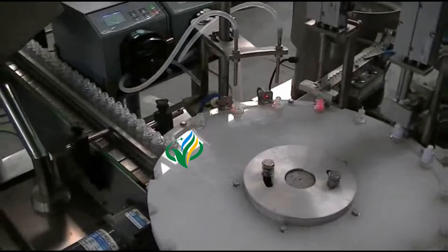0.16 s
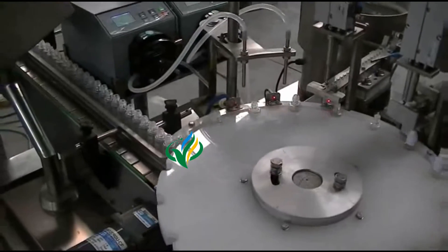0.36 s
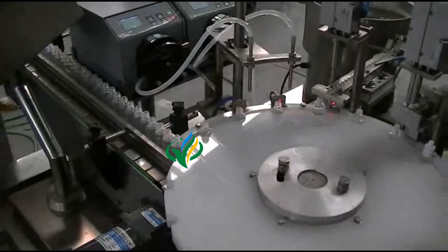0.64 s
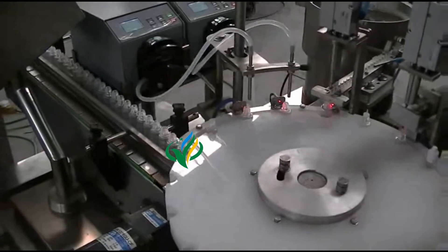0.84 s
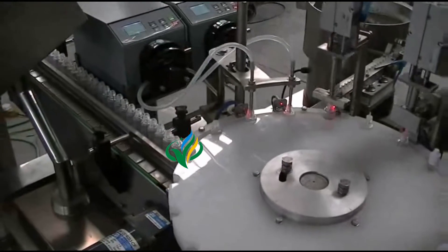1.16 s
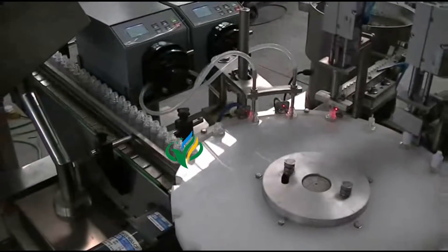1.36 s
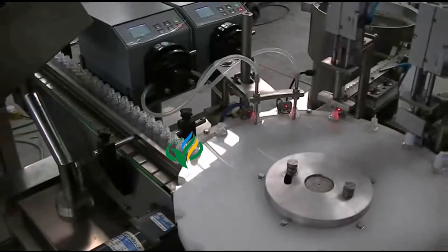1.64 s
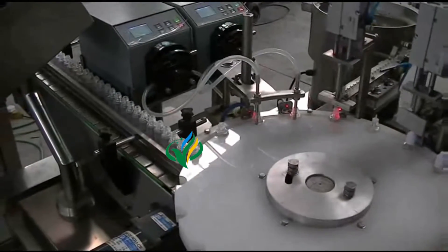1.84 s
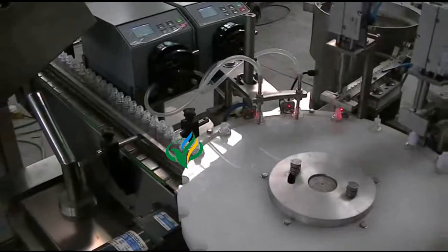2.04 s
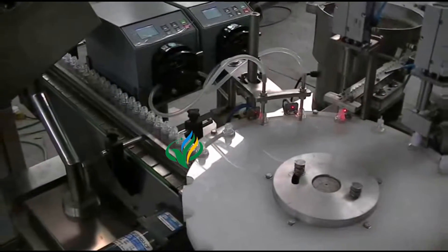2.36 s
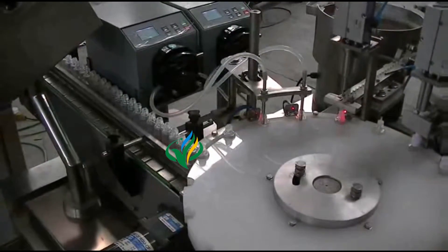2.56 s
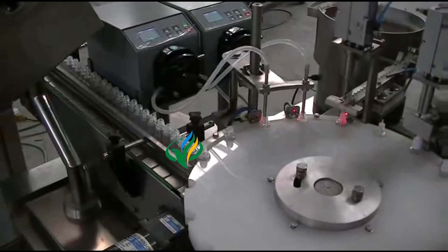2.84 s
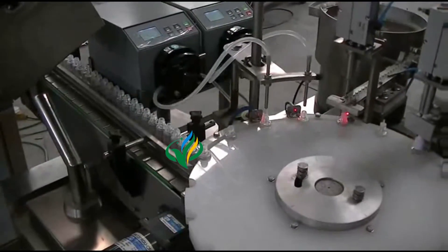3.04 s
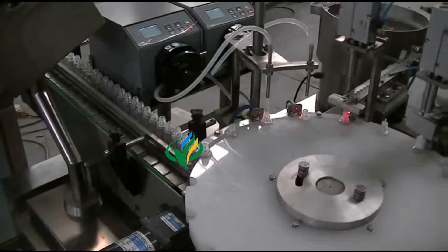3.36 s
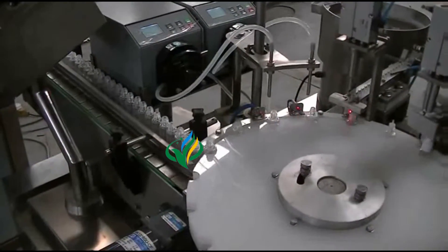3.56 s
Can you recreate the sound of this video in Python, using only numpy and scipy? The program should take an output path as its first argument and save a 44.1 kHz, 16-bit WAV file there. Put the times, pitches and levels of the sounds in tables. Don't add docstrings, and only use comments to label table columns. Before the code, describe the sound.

Strong bright air-jet hiss runs throughout over motor and belt roar, a buzzing feeder bowl and fine cap rattle; metal knocks and sharp valve ticks cluster near the middle. Close, nearly mono handheld microphone indoors.

```python
import sys
import numpy as np
from scipy import signal
from scipy.fft import rfft, irfft, next_fast_len
from scipy.io import wavfile
from scipy.ndimage import uniform_filter1d

SR = 44100
rng = np.random.default_rng(int(sys.argv[2]) if len(sys.argv) > 2 else 0)


def pcm_store(signal):
    levels = np.round(np.clip(np.atleast_2d(signal), -1, 1) * 32767)
    wavfile.write(sys.argv[1], SR, levels.astype(np.int16).T)


def convert_level_to_amplitude(level_db):
    exponent = np.asarray(level_db, float) / 20
    return 10 ** exponent


N = 162729


def evened(x):
    return x / np.sqrt(np.mean(x ** 2) + 1e-20)


def read(points, hz):
    f, value = np.transpose(points)
    return np.interp(np.log(hz + 1), np.log(f + 1), value)


def curve(points, t):
    return np.interp(t, *np.transpose(points))


def bell(x, centre, width):
    return np.exp(-.5 * ((x - centre) / width) ** 2)


def drift(t, rate_hz):
    slow_t = t[::200]
    f = np.geomspace(.3, rate_hz, num=20)[:, None]
    waves = np.sin(2 * np.pi * (f * slow_t + rng.random((20, 1)))) / np.sqrt(f)
    return np.interp(t, slow_t, evened(waves.sum(0)))


def noise(field_db, patchy_db, flicker_db, streak_db):
    frames = N // 256 + 6
    hz = np.fft.rfftfreq(1024, 1 / SR)
    t = np.arange(frames)[:, None] * 256 / SR

    def smoothed(x, in_time, in_frequency):
        return evened(uniform_filter1d(uniform_filter1d(x, size=in_time, axis=0), size=in_frequency, axis=1))

    a, b, patches, flicker, streaks = rng.standard_normal((5, frames, 513))
    level_db = field_db(hz, t) + patchy_db * smoothed(patches, 10, 12)
    level_db = level_db + flicker_db * smoothed(flicker, 2, 160)
    level_db = level_db + streak_db * smoothed(streaks, 120, 2)
    z = (a + 1j * b) * convert_level_to_amplitude(level_db)
    return evened(signal.istft(z.T, nperseg=1024, noverlap=768)[1][:N])


def coloured(x, gain):
    size = next_fast_len(N)
    return irfft(rfft(x, size) * gain(np.fft.rfftfreq(size, 1 / SR)), size)[:N]


def shade_db(hz, s):
    # t/s, length/s, f/Hz, width/Hz, change/dB
    crossings = [(0.49, .3, 9940, 277.8, 5), (0.16, 0.21, 3981, 833.3, 0.5), (1.16, 0.21, 5700, 570, 0.8),
                 (1.75, 0.22, 6000, 520, 1.6), (1.66, 0.22, 12300, 3020, -1.2),
                 (2.095, 0.021, 6000, 1100, -4.5), (2.16, 0.028, 6300, 500, -2.5),
                 (2.214, 0.043, 11400, 600, 4), (2.239, .08, 14600, 1200, 2), (2.25, 0.072, 4000, 972, 1),
                 (3.26, 0.03, 3100, 972, -2.5), (3.37, 0.067, 5100, 600, 2.5),
                 (3.55, 0.033, 3200, 555.6, -2.5), (3.6, .1, 9600, 900, 1)]
    return sum(db * bell(s, at, length) * bell(hz, f, width) for at, length, f, width, db in crossings)


def jets(t):
    # t/s, level/dB
    jet_level = [
        (0.0, -19),
        (0.01, -19.5),
        (1.96, -19.5),
        (2.05, -19),
        (2.08, -19.5),
        (2.22, -19.5),
        (3.66, -19),
        (3.69, -22),
    ]
    # f/Hz, level per Hz/dB
    jet_air = [(1650, -47), (2800, -8), (5010, -4.5), (5610, -1.5), (6670, 0), (7270, -4), (7870, -3.5),
               (13800, -15), (15600, -26)]
    # f/Hz, width/Hz, lift/dB
    nozzles = [(4850, 240, 0), (3780, 210, 2), (4264, 70, 4.5), (4710, 160, 2.5), (5470, 70, 5.5),
               (5880, 150, 3.5), (6350, 260, 1.5), (6870, 66, 3), (8000, 170, 4.5), (7970, 140, 0.5),
               (8730, 330, 2.5), (10000, 200, -1), (13750, 450, 0.5), (14000, 400, 2)]

    def field_db(hz, s):
        early = 1 / (1 + np.exp((s - 1.25) / 0.14))
        treble = 1 / (1 + np.exp((9500 - hz) / 400))
        return shade_db(hz, s) + 0.3 * early * treble

    def gain(hz):
        lift_db = sum(db * bell(hz, f, width / 2) for f, width, db in nozzles)
        low_cut = 1 / (1 + (3000 / (hz + 1)) ** 4)
        return convert_level_to_amplitude(read(jet_air, hz) + lift_db) * low_cut

    air = noise(field_db, patchy_db=0.77, flicker_db=0.63, streak_db=1.54)
    return convert_level_to_amplitude(curve(jet_level, t) + 1) * evened(coloured(air, gain))


def nearness_db(t):
    # t/s, level/dB
    near = [
        (0.0, -28.5),
        (0.12, -31),
        (0.14, -29.5),
        (1.08, -30),
        (2.62, -27.5),
        (3.3, -29.5),
        (3.38, -27.5),
        (3.45, -29),
        (3.69, -29),
    ]
    return curve(near, t) + 29.5


def drives(t):
    # f/Hz, level per Hz/dB
    roar_spectrum = [(30, -34), (75, -22.5), (105, -11.5), (400, -4.5), (480, -9.5), (560, -2), (930, -7.5),
                     (1300, -2), (2500, 1)]
    # f/Hz, width/Hz, level/dB
    guards = [(62, 9, -62), (430, 22, -48), (893, 6, -49), (1232, 12, -48), (1667, 5, -44),
              (1686, 22, -41.5), (1490, 130, -43), (2140, 50, -44), (2265, 10, -48), (2575, 16, -48),
              (2615, 25, -44), (2645, 20, -44)]
    # f/Hz, t/s, length/s, lift/dB
    loaded = (2630, 1.5, 1.3, 8.7)
    loaded_hz, loaded_s, loaded_length_s, loaded_db = loaded
    load = bell(t, loaded_s, loaded_length_s) - .5

    def roar_gain(hz):
        return convert_level_to_amplitude(read(roar_spectrum, hz)) / (1 + (hz / 3380) ** 4)

    white = noise(shade_db, patchy_db=1.0, flicker_db=0.5, streak_db=1.5)
    out = convert_level_to_amplitude(-28) * evened(coloured(white, roar_gain))
    for hz, width, db in guards:
        ring = coloured(rng.standard_normal(N), lambda f: 1 / np.hypot(1, 2 * (f - hz) / width) ** 2)
        lift_db = loaded_db * bell(hz, loaded_hz, 80.) * load
        waver_db = .8 * drift(t, 8.)
        out = out + convert_level_to_amplitude(db + lift_db + waver_db) * evened(ring)
    return out * convert_level_to_amplitude(nearness_db(t))


def bowl(t):
    # multiple of the mains, level/dB
    buzz = [(2, -29), (3, -6), (4, -6), (5, -25), (6, -7), (7, -7), (8, -4), (9, -12), (10, -17), (11, -14),
            (12, .6), (13, -3.4), (14, -13), (15, -16), (16, -23), (19, -19), (20, -14), (21, -15),
            (22, -19), (23, -6.5), (24, -20), (25, -12), (29, -17), (31, -13)]
    mains_hz, waver_db, phase_spread_rad = 49.965, 1.0, .65
    out = np.zeros(N)
    for k, db in buzz:
        phase = phase_spread_rad * rng.standard_normal()
        level = convert_level_to_amplitude(db + waver_db * drift(t, 5.07))
        out += level * np.cos(2 * np.pi * k * mains_hz * t + phase)
    return -convert_level_to_amplitude(nearness_db(t) - 32) * evened(out)


def rattle():
    taps_per_s, spread_db = 560, 2
    size = convert_level_to_amplitude(spread_db * np.minimum(rng.exponential(1, N), 5))
    size = size * (rng.random(N) < taps_per_s / SR)
    kind = rng.integers(0, 24, N)
    t, out = np.arange(900) / SR, np.zeros(N)
    for k, hz in enumerate(np.geomspace(1500, 11000, num=24)):
        ping = np.sin(2 * np.pi * hz * t) * np.exp(-t * hz / 27.0)
        ping = ping * np.minimum(t / 0.00022, 1)
        out += signal.oaconvolve(size * (kind == k), ping)[:N]
    return convert_level_to_amplitude(-38) * evened(out)


def hall():
    # f/Hz, level per Hz/dB
    hall_spectrum = [(40, -33), (143, -1.5), (638, -6), (2850, -6), (6180, -2), (8700, -7.5), (11000, -7),
                     (15600, -7.5)]
    wide = noise(lambda hz, s: 0 * hz * s, patchy_db=3.5, flicker_db=-0.5, streak_db=3.5)
    return convert_level_to_amplitude(-34.5) * evened(coloured(wide, lambda hz: convert_level_to_amplitude(read(hall_spectrum, hz))))


def hits(t, blows, crack_db, crack_s, crack_q):
    out = np.zeros(N)
    u = t[:SR // 4]
    for s, db, hz, t60 in blows:
        at = round(s * SR)
        wobble = .4 * evened(uniform_filter1d(rng.standard_normal(len(u)), size=300))
        pair = np.sin(2 * np.pi * hz * u + wobble)
        pair = pair + convert_level_to_amplitude(-14) * np.sin(2 * np.pi * hz * 1.03 * u)
        burst = rng.standard_normal(len(u)) * np.exp(-u / crack_s)
        crack = signal.lfilter(*signal.iirpeak(hz, crack_q, SR), burst)
        onset = np.minimum(u * hz / 3, 1)
        out[at:at + len(u)] += convert_level_to_amplitude(db) * onset * (pair * convert_level_to_amplitude(-60 * u / t60) + convert_level_to_amplitude(crack_db) * crack)
    return out


def grippers(t):
    # t/s, level/dB, ring f/Hz, t60/s
    knocks = [(.24, -37, 1263, 0.37), (.85, -24, 1714, .12), (.97, -27, 1900, .06), (1.33, -22, 2130, 0.14),
              (1.35, -25.5, 1235, 0.36), (1.39, -26, 1240, .3), (1.494, -26, 1252, 0.24),
              (1.55, -26, 1273, 0.17), (2.6, -27, 1714, .2), (2.64, -28, 910, .2), (3.185, -24, 1660, .08),
              (3.295, -24, 1660, 0.22), (3.321, -25, 1570, .15), (3.349, -23.5, 2650, .15),
              (3.365, -27, 2180, .15), (3.384, -28, 1350, .2)]
    return hits(t, knocks, crack_db=7, crack_s=0.0096, crack_q=1.1)


def valves(t):
    # t/s, level/dB, ring f/Hz, t60/s
    ticks = [
        (1.3405, -14.5, 10700, .02),
        (1.4208, -12.5, 10800, .022),
        (1.437, -17, 10700, .025),
        (1.49, -24, 10800, .012),
        (2.16, -21, 11400, 0.033),
        (2.21, -24, 11600, .03),
    ]
    return hits(t, ticks, crack_db=0, crack_s=.004, crack_q=4.5)


def scene():
    t = np.arange(N) / SR
    mid = jets(t) + drives(t) + bowl(t) + rattle()
    side = hall()
    mid = mid + grippers(t) + valves(t)
    right_db = 0.8
    return np.array([(mid + side) * convert_level_to_amplitude(-right_db / 2), (mid - side) * convert_level_to_amplitude(right_db / 2)])


def band_limit(x):
    return signal.sosfilt(signal.butter(12, 15740, fs=SR, output="sos"), x)


def record(dry):
    return band_limit(dry)


dry = scene()
out = record(dry)
pcm_store(out)
```